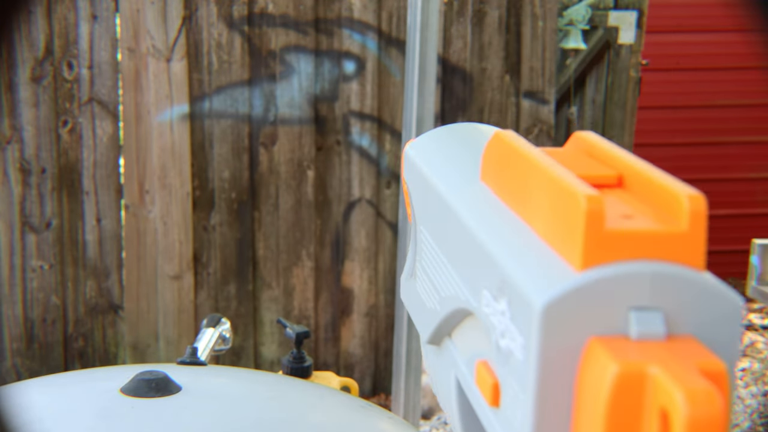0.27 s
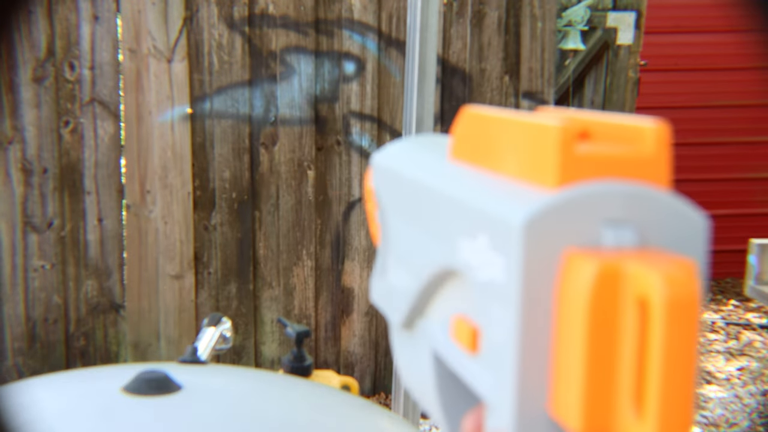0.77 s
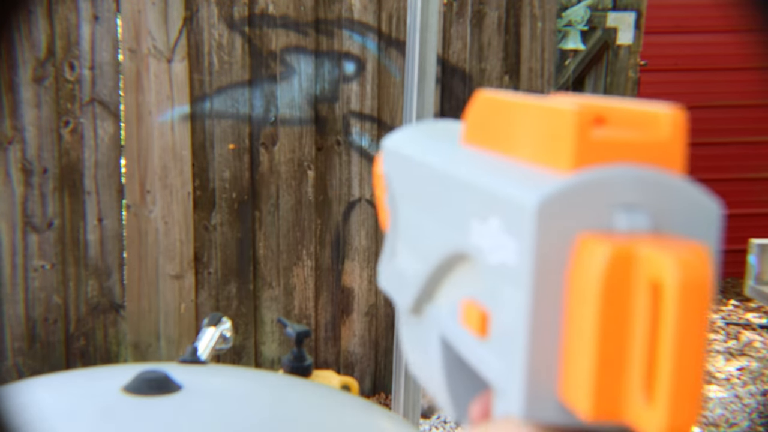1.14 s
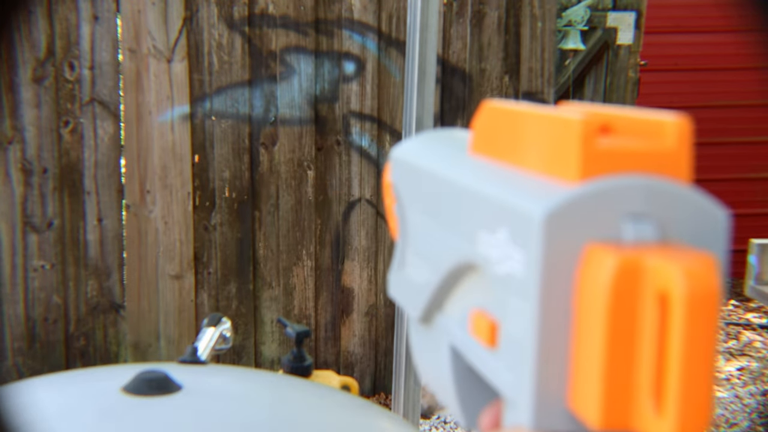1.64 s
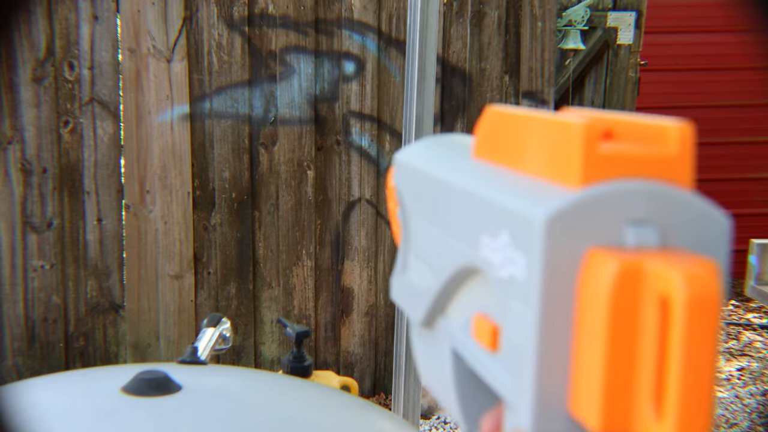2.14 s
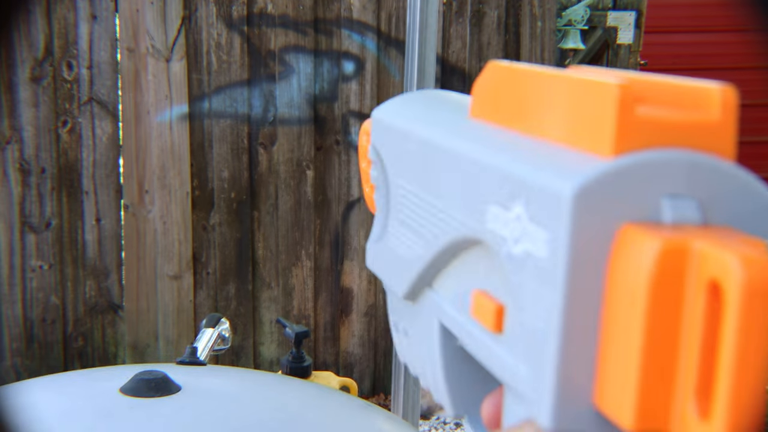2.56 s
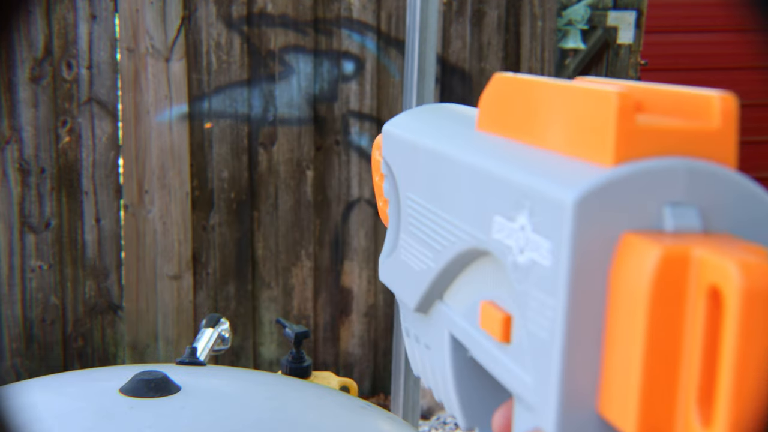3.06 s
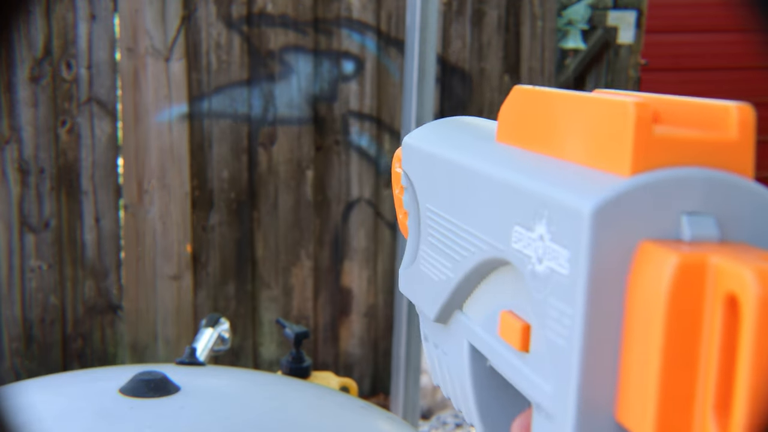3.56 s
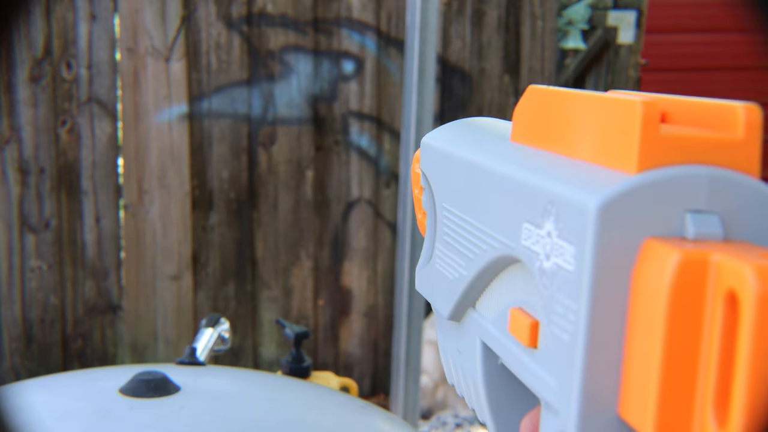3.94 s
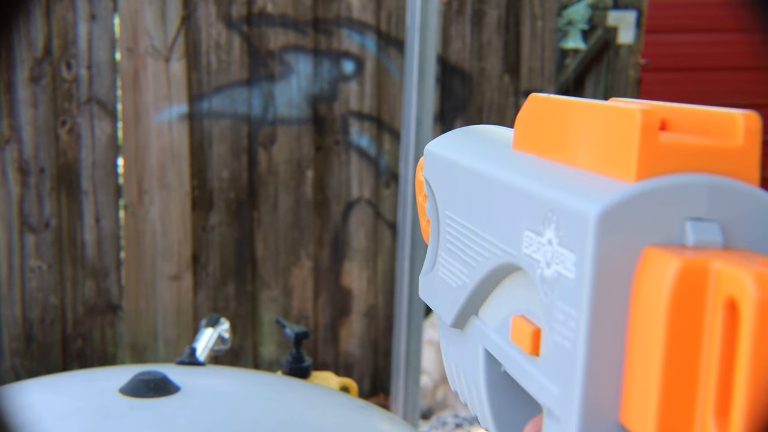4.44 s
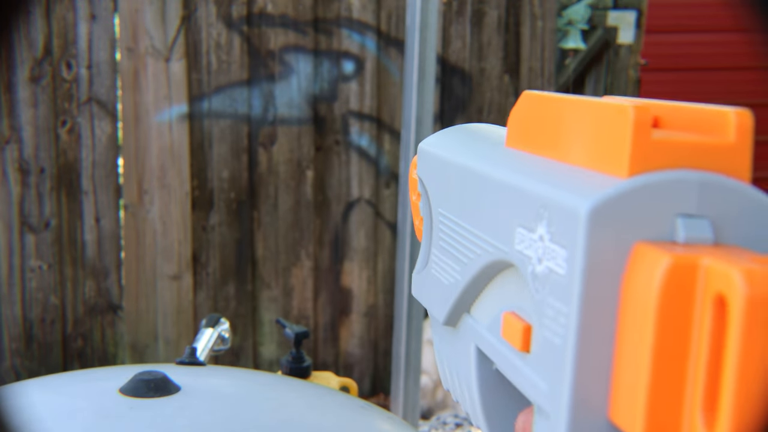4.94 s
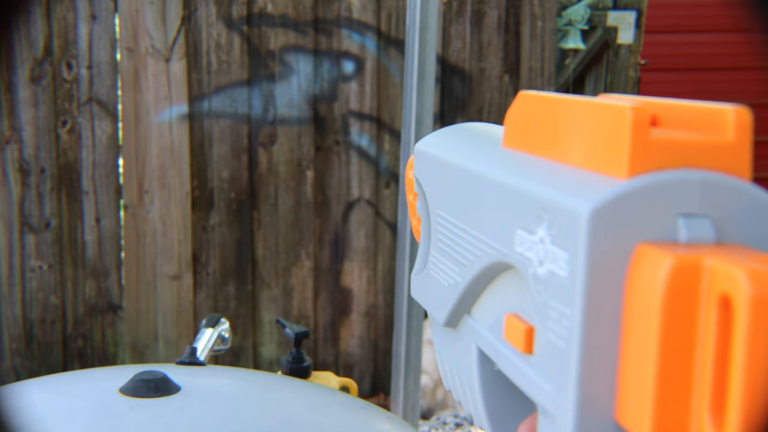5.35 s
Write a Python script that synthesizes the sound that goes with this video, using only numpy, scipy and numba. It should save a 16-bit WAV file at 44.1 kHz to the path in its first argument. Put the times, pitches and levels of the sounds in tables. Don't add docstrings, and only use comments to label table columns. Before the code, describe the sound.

Close, dry, centred sound of a plastic toy gun cycling rapidly outdoors: gears grind, an airy whine slides down, a catch snaps, a piston whacks the hollow shell. Hard shots give way to cushioned, irregular pops, then hard ones again. A tiny silent dropout comes past the middle, a gust late; faint fence reflection and low distant drone sit behind.

```python
import sys
import numpy as np
from scipy import signal
from scipy.fft import rfft, irfft
from scipy.io import wavfile
from scipy.ndimage import uniform_filter1d
from numba import njit

SR = 44100
rng = np.random.default_rng(int(sys.argv[2]) if len(sys.argv) > 2 else 0)


def log_audio(samples):
    frames = np.atleast_2d(samples).T
    limited = np.clip(frames, -1, 1)
    pcm = np.round(limited * 32767).astype(np.int16)
    wavfile.write(sys.argv[1], SR, pcm)


def nominal_scale(level):
    x = np.asarray(level, float) / 20
    return 10 ** x


N = 246739
RING_S = np.arange(int(.04 * SR)) / SR


def level(x, db):
    return x * nominal_scale(db) / np.sqrt(np.mean(x ** 2))


def noise():
    return rng.standard_normal(N)


@njit
def svf(x, hz, width):
    y, b, l = np.empty(len(x)), 0., 0.
    for i in range(len(x)):
        g, k = np.tan(np.pi * hz[i] / SR), width / hz[i]
        v = (b + g * (x[i] - l)) / (1 + g * (g + k))
        b, l, y[i] = 2 * v - b, l + 2 * g * v, k * v
    return y


def band(x, hz, width_hz):
    return svf(x, hz + np.zeros(len(x)), float(width_hz))


def ring(push, modes):
    body = 0
    for hz, db, t60 in modes:
        decay = 1000. ** (-RING_S / np.clip(t60, .002, .03))
        body = body + nominal_scale(db) * np.sin(2 * np.pi * hz * RING_S) * decay
    return np.convolve(push, body)


def pushes(bounces):
    force = 0
    for ms, db, wide in bounces:
        phase = np.clip((RING_S * 1000 - ms) / wide, 0, 1)
        force = force + nominal_scale(db) / wide * np.sin(np.pi * phase)
    return force


def burst(t60, rise=0.00014):
    swell = np.minimum(RING_S / rise, 1) ** 2
    decay = 1000. ** (-np.maximum(RING_S - rise, 0) / t60)
    return rng.standard_normal(len(RING_S)) * swell * decay


def add(out, s, sound, db, by=np.max):
    i = int(s * SR)
    out[i:i + len(sound)] += (sound * nominal_scale(db) / by(np.abs(sound)))[:N - i]


def walk(rate):
    k = int(SR / rate)
    steps = np.repeat(rng.standard_normal(N // k + 1), k)
    w = uniform_filter1d(uniform_filter1d(steps, k), k)[:N]
    return w / w.std()


def vibrate(hz):
    return np.sqrt(2) * np.sin(2 * np.pi * np.cumsum(hz) / SR)


def plateau(at, span, fall):
    return -fall * np.maximum(np.maximum(span[0] - at, at - span[1]), 0)


# change in seconds, time the slam was due in seconds.
CUT_WINDUPS = [
    (2.590, 2.621),
    (5.030, 5.043),
]


def countdown(t):
    slams_due = [(row[0], row[0]) for row in EMPTY_SHOTS + LOADED_SHOTS]
    ends, due = np.transpose(sorted(slams_due + CUT_WINDUPS + [(5.685, 5.685)]))
    return 1000 * (due[np.searchsorted(ends, t)] - t)


def feeding(t):
    shots = [(row[0], 0) for row in EMPTY_SHOTS] + [(row[0], 1) for row in LOADED_SHOTS]
    return np.interp(t, *np.transpose(sorted(shots)))


def spring_strain(ms):
    wind_ms, let_go_ms = 100, 31
    return np.clip((wind_ms - ms) / (wind_ms - let_go_ms), 0, 1)


# frequency in Hz, density in dB per Hz.
GRIND_SPECTRUM = [(71, -65), (120, -20.5), (316, -6.5), (396, -4), (611, -7), (706, -11), (961, -7),
                  (1280, -7.5), (1610, -10.5), (1900, -1), (2280, -6), (6140, -9), (12900, -35),
                  (16500, -56)]
# start in seconds, level in dB, treble in dB,
# brush hiss in dB.
HOLDS = [
    (0, -25, -38.5, -44),
    (.6, -25, -39, -42.5),
    (1.8, -24.5, -40.5, -42.5),
    (2.59, -25, -37, -45),
    (3.625, -25, -37, -44),
    (5.03, -26, -38, -45),
]


def grind(t):
    strain, feed, duck_db = spring_strain(countdown(t)), feeding(t), gust(t)[2]
    start_s, *held = np.transpose(HOLDS)
    now = np.maximum(np.searchsorted(start_s, t, "right") - 1, 0)
    low_db, top_db, brush_db = (column[now] for column in held)
    low_db = low_db + 2 * (strain - 1) - 1.06 * feed
    treble_db = 7 * (np.minimum(1.4 * strain, 1) - 1)
    top_db = top_db + treble_db + 6
    brush_db = brush_db + (.5 - .3 * feed) * treble_db - .6 * duck_db + 4

    hz = np.fft.rfftfreq(N, 1 / SR) + 1
    table_hz, table_db = np.transpose(GRIND_SPECTRUM)
    colour = nominal_scale(np.interp(np.log(hz), np.log(table_hz), table_db))
    low_share = 1 / (1 + (hz / 4800) ** 6)
    airy = 1 / (1 + (7600 / hz) ** 8)
    teeth = nominal_scale(1.1 * walk(75) + 1.7 * walk(500))

    def rub(share):
        return level(irfft(rfft(noise() * teeth) * colour * share, N), 0)

    low = rub(low_share)
    top = rub((1 - low_share) * (1 - airy))
    brush = rub(airy / (1 + (hz / 13000) ** 4))
    return nominal_scale(low_db) * low + nominal_scale(top_db) * top + nominal_scale(brush_db) * brush


def whine(hz, width_hz, pure):
    tone = vibrate(hz * (1 + .014 * walk(300)))
    rough = level(band(band(noise(), hz, width_hz), hz, width_hz), 0)
    return pure * tone + np.sqrt(1 - min(pure, 1) ** 2) * rough


def cylinder(t):
    ms = countdown(t)
    pipe_hz = 1421.5 + 7.0 * ms
    first_db = np.maximum(plateau(ms, (26, 70), .55), -18)
    second_db = np.maximum(plateau(ms, (6.5, 46.5), .55), -18)
    throb = nominal_scale(2.5 * np.sin(2 * np.pi * np.cumsum(76 + 8 * walk(20)) / SR))
    first = throb * whine(pipe_hz, 220, pure=.85)
    second = throb * whine(1150 + 1.28 * pipe_hz, 440, pure=.4)
    pipe_db = -31 + 1.8 * feeding(t) + gust(t)[2]
    return nominal_scale(pipe_db) * (nominal_scale(first_db + 0.9) * first + nominal_scale(second_db + 2.1) * second)


def shaft(t):
    ms = countdown(t)
    fastest_ms, cycle_ms = 55, 123
    cog_at_ms, cog_ms = 97.5, 22.2
    hz = 395 + 10 * np.cos(2 * np.pi * (ms - fastest_ms) / cycle_ms)
    strain_db = -14.5 * spring_strain(ms) ** 2.8
    cog_db = 4 * np.cos(2 * np.pi * (ms - cog_at_ms) / cog_ms)
    tone = vibrate(hz * (1 + 0.003 * walk(40))) * nominal_scale(0.95 * walk(60))
    return nominal_scale(-33 - 4 * feeding(t) + strain_db + cog_db + gust(t)[2] + 2.5) * tone


def gearbox(t):
    return nominal_scale(gust(t)[2]) * (grind(t) + cylinder(t) + shaft(t))


# frequency in Hz, rms level in dB.
FAR_HUM = [(59.2, -42), (107.7, -44)]


def yard(t):
    drone = 0
    for hz, db in FAR_HUM:
        tone = vibrate(hz * (1 + 0.04 * walk(14))) * nominal_scale(1.7 * walk(14))
        drone = drone + level(tone, db + 1.0)
    air = level(band(band(noise(), 55, 60), 55, 60), -48)
    ducked = np.clip((countdown(t) - 28) / (104 - 28), 0, 1)
    pump = nominal_scale(uniform_filter1d(-10.5 * ducked, size=400) + 3.5)
    return pump * (drone + air)


# time in
# seconds, snap in dB.
SOFT_RELEASES = [(0.5606, -0.5), (0.6357, -11), (0.758, -4), (0.8813, -11), (1.0023, -14), (1.123, -3),
                 (1.247, -12), (1.368, -7), (1.49, -10), (1.6124, -2), (1.7349, -4), (2.9273, -15),
                 (3.172, -12), (3.4145, -7.5), (5.017, -6)]
# frequency in Hz, level in dB, decay t60 in seconds.
CATCH_MODES = [(3560, 6, 0.0017), (4600, 9, 0.0025), (5960, 11, 0.0025), (6840, -4.5, 0.012),
               (8610, -12, 0.017), (10100, -84, 0.0016)]
# time in seconds, frequency in Hz, peak in dB.
LOOSE_TICKS = [
    (4.997, 3330, -15),
    (5.074, 6600, -22),
    (5.133, 3970, -19),
    (5.138, 1500, -16),
    (5.169, 7800, -13),
    (5.175, 4800, -9),
    (1.512, 2580, -34),
    (3.243, 2040, -43),
]


def clicks():
    out, energy = np.zeros(N), np.linalg.norm
    knock_modes = [(hz, 0, .012) for hz, _, _ in SHELL_MODES[1:9]]
    for s, db in [row[1:] for row in EMPTY_SHOTS] + SOFT_RELEASES:
        snap = band(ring(burst(.016, rise=.0001), CATCH_MODES), 6200, 4500)
        add(out, s, snap, 7 + 0.46 * db, energy)
        sparkle = band(band(burst(0.004, rise=.0001), 14700, 5000), 14700, 5000)
        add(out, s, sparkle, -14 + db, energy)
        knock = band(ring(burst(0.021, rise=0.00096), knock_modes), 1340, 2600)
        add(out, s, knock, 4 + 0.34 * db, energy)
    for s, hz, db in LOOSE_TICKS:
        add(out, s, ring(burst(0.0035, rise=0.0013), [(hz, 0, .012)]), db)
    return out


# slam in seconds, release in seconds, snap in dB.
EMPTY_SHOTS = [(0.098, .0729, -1), (0.221, .195, -3), (0.343, .3173, -2), (0.463, .4388, -1),
               (1.884, 1.8571, 0), (2.006, 1.9804, 2), (2.128, 2.1029, 2), (2.251, 2.2254, 0.5),
               (2.374, 2.3476, 2), (2.497, 2.4709, 1), (2.707, 2.6824, -3), (2.829, 2.8044, -4),
               (3.074, 3.049, -15), (3.319, 3.2928, -2), (3.563, 3.5364, -5), (3.682, 3.6558, 1),
               (3.805, 3.7785, 2), (3.927, 3.9023, 2), (4.051, 4.0256, 3), (4.175, 4.149, 0),
               (4.299, 4.2732, -1), (4.422, 4.3961, 3), (4.546, 4.5211, 0), (4.669, 4.6441, 1.5),
               (4.794, 4.768, 1), (4.918, 4.892, 2), (5.179, 5.1561, -10), (5.311, 5.2837, 0),
               (5.435, 5.4093, -1), (5.56, 5.5343, -3)]
# frequency in Hz, level in dB, decay t60 in seconds.
SHELL_MODES = [(378, -38, 0.09), (565, -12, 0.039), (794, -5.5, 0.0086), (901, 1.5, 0.013),
               (1130, -3.5, 0.012), (1493, -3, 0.029), (1844, -4, 0.026), (2150, 1, 0.021),
               (2410, 7, 0.011), (2816, -2.5, 0.02), (4080, -5, 0.017), (6100, -46, .006)]
# delay in ms, force in dB, contact in ms.
PISTON_BOUNCES = [(0, 8, 0.067), (0.725, -1, .16), (1.804, 2.5, 0.22), (2.835, 4.5, 0.31),
                  (3.775, -3.5, 0.33), (4.454, -13, 0.17), (5.437, -6, 0.12), (6.17, 2, 0.41),
                  (11.47, -1.5, 0.87), (15.9, -13, 0.18), (24.74, -3.5, 0.73)]


def empty_slams():
    out, energy = np.zeros(N), np.linalg.norm
    for s, *_ in EMPTY_SHOTS:
        scatter = rng.standard_normal(len(PISTON_BOUNCES))
        bounces = [(ms + .008 * e, db + .5 * e, wide) for (ms, db, wide), e in zip(PISTON_BOUNCES, scatter)]
        add(out, s + .0001, ring(pushes(bounces), SHELL_MODES), 5.5)
        add(out, s + .0001, band(burst(0.0094), 2800, 4200), -11.5)
        add(out, s, band(burst(0.013), 8400, 4000), -22.5)
        thump_modes = [(334, 3.5, 0.035), (388, -3.0, 0.032), (500, -4, .025)]
        thump = ring(pushes([(0, 0, 0.79), (3, 0, 0.85)]), thump_modes)
        add(out, s + .001, thump, 3.5, energy)
        rattle = ring(burst(.012, rise=0.00093), [(3080, 0, 0.009)])
        add(out, s + 0.016, rattle, -7, energy)
    return out


# time in seconds, peak in dB, pop in Hz, thud in Hz.
LOADED_SHOTS = [(0.587, -6, 960, 940), (0.66, -3, 2150, 519), (0.785, -6.5, 1140, 385),
                (0.905, -1.5, 2300, 382), (1.027, -1, 1633, 510), (1.149, -4, 1210, 521),
                (1.272, -2, 1130, 828), (1.394, -1.5, 1210, 376.4), (1.515, -7, 1140, 450),
                (1.639, -9, 2355, 378), (1.76, -2.5, 1130, 565), (2.953, -7, 2360, 415),
                (3.197, -3, 2370, 388), (3.442, 0.5, 2030, 391)]
# time in seconds, peak in dB, pop in Hz, thud in Hz.
SHOT_TAIL = (2.591, -4, 2060, 387)


def loaded_slams():
    out = np.zeros(N)
    shots = [(row, -9.5) for row in LOADED_SHOTS] + [(SHOT_TAIL, -23)]
    for (s, db, pop_hz, thud_hz), squeak_db in shots:
        gaps = rng.random((3, 2))
        knock_ms = np.cumsum(.5 + 1.6 * gaps[:, 0])
        knocks = pushes([(ms, -6 * soft, .2 + .15 * soft) for ms, soft in zip(knock_ms, gaps[:, 1])])
        pop_modes = [(pop_hz, 2, .008), (1750, -2, .007), (1200, 0, .008), (thud_hz, -2, .012), (2600, -3, .006)]
        add(out, s - .001, ring(knocks, pop_modes), db)
        thud_modes = [(thud_hz, 0, .02), (400, -3, .03), (540, 1, .02), (310, -7, .03), (170, -3, .03)]
        add(out, s - .001, ring(burst(0.0086, rise=0.00083), thud_modes), 5, np.linalg.norm)
        add(out, s - .004, band(burst(.03, rise=0.00296), 9600, 6000), squeak_db - 14)
        squeak_modes = [(2310, 15.5, 0.011), (2820, 12.7, 0.0042), (1860, 13.7, 0.009), (4540, 4.3, 0.0039)]
        add(out, s - .005, ring(burst(0.04, rise=0.004), squeak_modes), squeak_db + 5)
        add(out, s + 0.013, ring(burst(0.016, rise=0.0014), [(2400, 0, 0.01)]), squeak_db - 8.5)
    return out


def gust(t):
    from_s, crest_s, break_s, drop_db_per_s = 5.034, 5.166, 5.18, 2000
    swell = np.minimum((t - from_s) / (crest_s - from_s), 1)
    rumble_db = -21 - 24 * (1 - swell) ** 3.0 + plateau(t, (0, crest_s), drop_db_per_s)
    hiss_db = -11 + plateau(t, (break_s, N), 430) + plateau(t, (0, break_s), drop_db_per_s)
    duck_db = np.minimum(-5.5 - plateau(t, (5.05, 5.128), 300), 0)
    return rumble_db, hiss_db, duck_db


def wind(t):
    rumble_db, hiss_db, _ = gust(t)
    eddies = level(band(band(noise(), 150, 430), 250, 1300), -3)
    rumble = vibrate(60 + 14 * walk(50)) + eddies
    hiss = level(band(band(band(noise(), 2300, 3300), 2300, 3000), 2600, 6000), -1.6)
    return rumble * nominal_scale(rumble_db) + hiss * nominal_scale(hiss_db)


def scene():
    t = np.arange(N) / SR
    bass_cut = signal.butter(2, 210, "high", fs=SR, output="sos")
    hits = signal.sosfilt(bass_cut, clicks() + empty_slams() + loaded_slams())
    fence = band(np.convolve(hits, burst(.12, rise=.015))[:N], 1500, 2500)
    sound = hits + level(fence, -35.5) + gearbox(t) + yard(t) + wind(t)
    return np.array([sound, sound])


def roll_off(x):
    return signal.sosfilt(signal.butter(12, 16810, fs=SR, output="sos"), x)


# start in seconds, end in seconds.
DROPOUT = (3.6185, 3.6305)


def record(dry):
    t = np.arange(N) / SR
    outside_s = np.maximum(DROPOUT[0] - t, t - DROPOUT[1])
    gap = np.clip(outside_s / 0.00033, .004, 1)
    hiss = level(band(noise(), 15000, 5000), -67.0)
    thin = signal.sosfilt(signal.butter(4, 44, "high", fs=SR, output="sos"), dry + hiss)
    squashed = thin / (1 + np.abs(thin / .58) ** 8) ** (1 / 8)
    dull = signal.sosfilt(signal.ellip(8, .2, 32, 15850, fs=SR, output="sos"), squashed)
    return roll_off(dull * gap)


dry = scene()
out = record(dry)
log_audio(out)
```